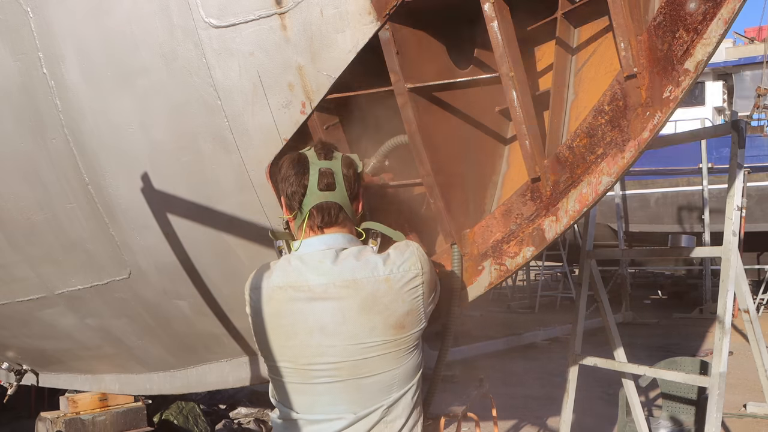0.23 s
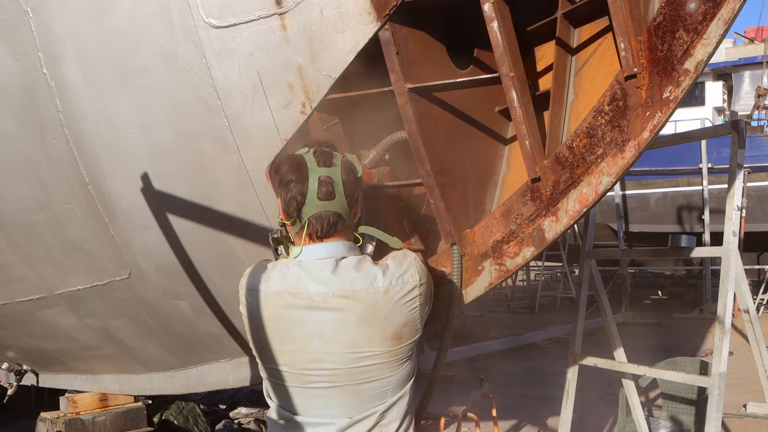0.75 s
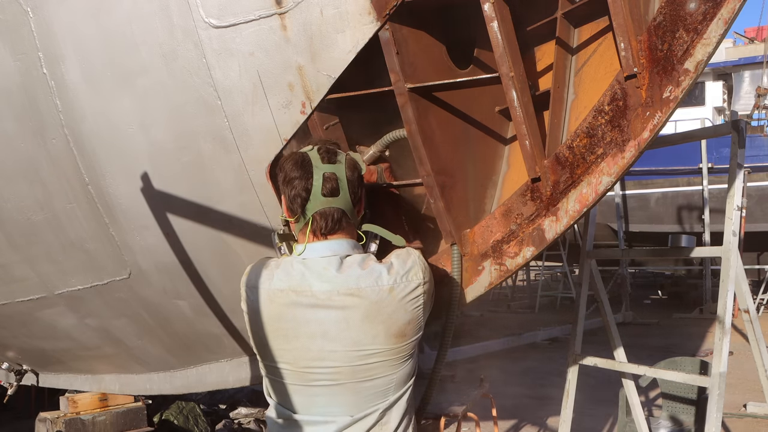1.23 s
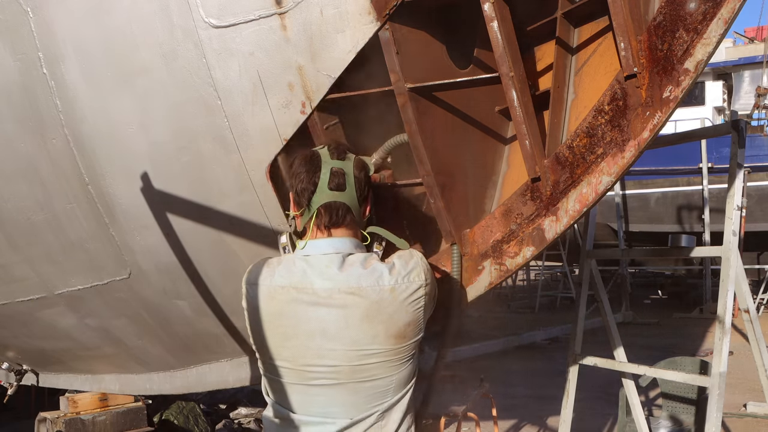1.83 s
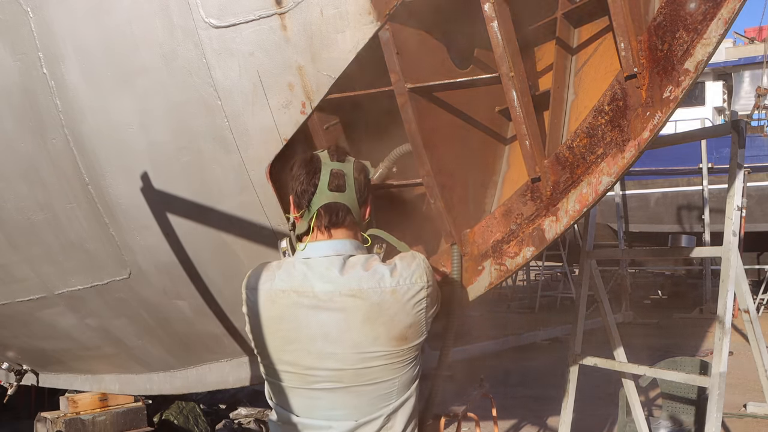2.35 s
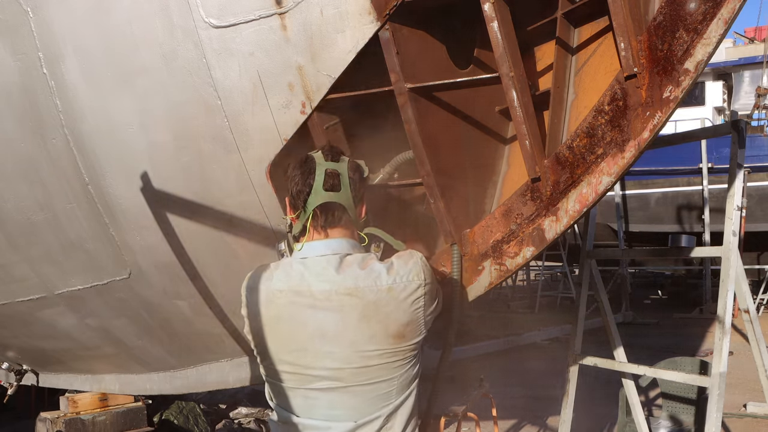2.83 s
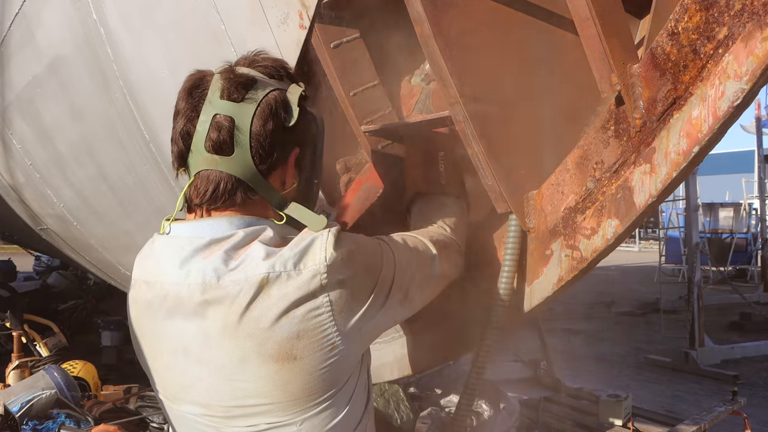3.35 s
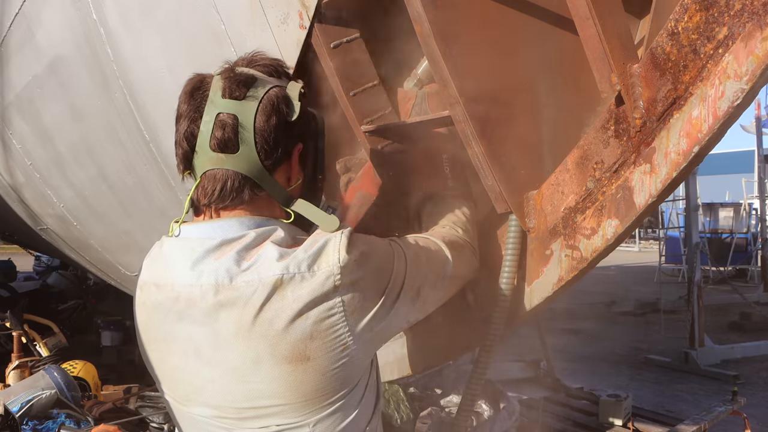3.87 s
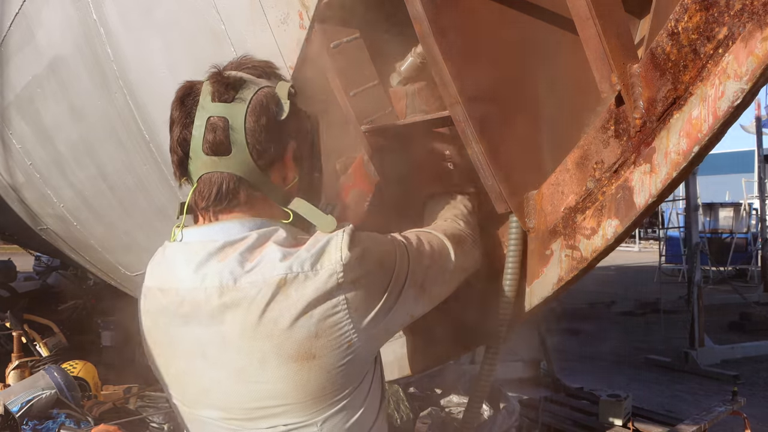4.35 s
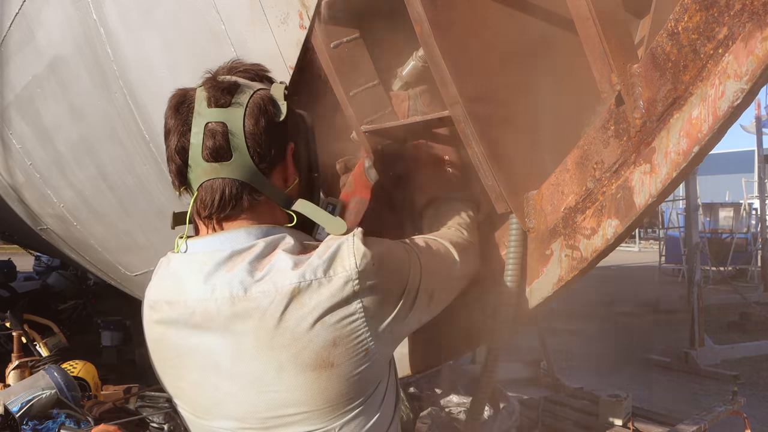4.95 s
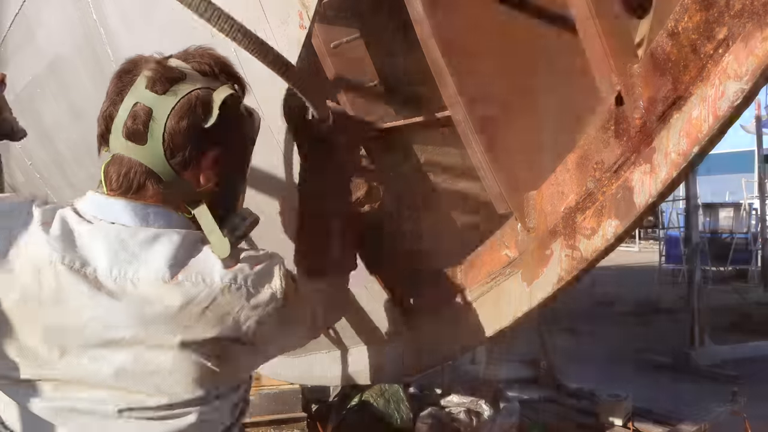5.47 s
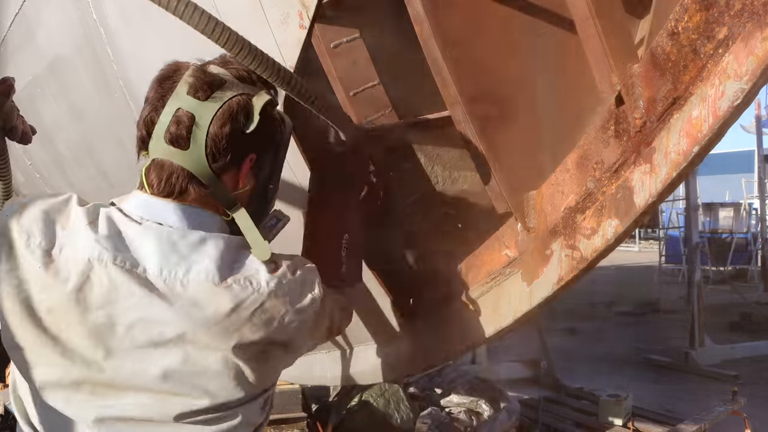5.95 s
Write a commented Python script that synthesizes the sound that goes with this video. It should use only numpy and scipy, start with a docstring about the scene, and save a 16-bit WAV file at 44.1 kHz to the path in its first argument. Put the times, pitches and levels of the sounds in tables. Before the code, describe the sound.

An unbroken pressurised hiss packed with tiny grain impacts scours a metal hull, heard close in mono. The feed sputters slightly, flaring as it bites and dipping as it slips, with brief airy whistling edges. The tone steps from hollow and boomy to bright and ringing, then to a thin sizzle with little body. A few soft low thumps from the hose and a very faint yard rumble lie underneath.

```python
"""A sandblaster plays a steady jet of air and grit on rusty plate inside a steel boat hull, over faint yard rumble.
First it fills a deep bay: noise and grain impacts ring through the bay's resonances, with early air puffs on the mic.
The grit feed sputters, the jet flares, sings at edges or slips, and the hose now and then bumps as a low push.
Near 3 s the jet moves to a corner by a rib, near 5.5 s to the open edge, and from 6 s it only grazes that edge.
Treble peaks and dips come and go, some steady, some gliding, and short delayed reflections comb the treble."""
import sys
import numpy as np
from scipy import signal
from scipy.fft import rfft, irfft, next_fast_len
from scipy.io import wavfile
from scipy.ndimage import map_coordinates

SR = 44100
rng = np.random.default_rng(int(sys.argv[2]) if len(sys.argv) > 2 else 0)


def store_wav(level_fs):
    """Save 16-bit WAV to argv[1]."""
    pcm = np.round(np.clip(np.atleast_2d(level_fs), -1, 1) * 32767)
    wavfile.write(sys.argv[1], SR, pcm.T.astype(np.int16))


N = 273661


def amp(db):
    """Decibels to gain."""
    return 10 ** (np.asarray(db) / 20)


def unit(x):
    """Scale to rms 1."""
    return x / np.sqrt(np.mean(x ** 2) + 1e-20)


def clock():
    """The time of every sample in seconds."""
    return np.arange(N) / SR


def along(points, hz):
    """Read (f/Hz, value) points on a log frequency axis."""
    f, value = np.transpose(points)
    return np.interp(np.log(hz + 1), np.log(f + 1), value)


def curves(rows):
    """One value per sample for each column after the time."""
    s, *columns = np.transpose(rows)
    return [np.interp(clock(), s, column) for column in columns]


def wobble(rate):
    """A smooth random curve of rms 1, with rate knots a second."""
    knots = rng.standard_normal(4096)
    return unit(map_coordinates(knots, [clock() * rate], mode="wrap"))


def swell(s, length, release):
    """From 0 to 1 and back: a fast rise, a hold until s + length, then a release."""
    attack_s = 0.0094
    since = clock() - s
    rise = since / attack_s
    fall = 1 - (since - length) / release
    return np.clip(np.minimum(rise, fall), 0, 1)


def filtered(x, gain):
    """x times a gain that depends on frequency."""
    size = next_fast_len(N + SR // 4)
    hz = np.fft.rfftfreq(size, 1 / SR)
    return irfft(rfft(x, size) * gain(hz), size)[:N]


def ring(x, level_db, size=8192):
    """x through a causal, minimum-phase body with the given dB response: it rings after each grain."""
    hz = np.fft.rfftfreq(size, 1 / SR)
    cepstrum = irfft(np.log(amp(level_db(hz))))
    # fold the cepstrum onto positive time, so that nothing sounds before the blow
    cepstrum[1:size // 2] *= 2
    cepstrum[size // 2 + 1:] = 0
    response = irfft(np.exp(rfft(cepstrum)))
    return signal.fftconvolve(x, response)[:N]


def delayed(x, delay_s):
    """x heard over a path whose delay changes from moment to moment."""
    fine = signal.resample_poly(x, up=4, down=1)  # a finer grid for smooth interpolation
    position = (clock() - delay_s) * SR * len(fine) / N
    return np.interp(position, np.arange(len(fine)), fine)


def rumble(colour):
    """Noise of rms 1 with the given spectrum."""
    return unit(filtered(rng.standard_normal(N), lambda hz: amp(along(colour, hz))))


# distant rumble: f/Hz, relative level/dB
YARD_SPECTRUM = [(25, -8), (60, -7.5), (95, -0.5), (140, -21), (230, -8), (500, -18), (3000, -50)]


def yard(level_db):
    """The faint rumble of the boatyard: low noise of slightly uneven level."""
    return amp(level_db + 2.0 * wobble(12)) * rumble(YARD_SPECTRUM)


# stray air on the microphone: t/s of the peak, half length/s, level/dB
AIR_PUFFS = [(0.253, .028, -53.5), (.338, .025, -59), (1.755, 0.03, -54.5), (1.815, .03, -55),
             (1.91, .03, -66)]
# f/Hz, relative level/dB
PUFF_SPECTRUM = [(20, -14), (60, -4), (130, 1), (200, -1), (300, -14), (900, -50), (3000, -120)]


def puffs():
    """Soft low bumps of air on the microphone: bell-shaped bursts of low noise."""
    t = clock()
    push = sum(amp(db) * np.exp(-((t - s) / half) ** 2) for s, half, db in AIR_PUFFS)
    return push * rumble(PUFF_SPECTRUM)


# the hose bumps dully on the hull: t/s, strength/dB
HOSE_KNOCKS = [(.753, -14), (2.598, -13), (3.362, -7), (5.355, -7)]
# response of the hull to a bump: f/Hz, level/dB
KNOCK_RESPONSE = [(15, -14), (50, -3), (120, 0), (220, -4), (350, 3), (480, 6), (900, -33), (3000, -70)]


def knocks():
    """Each bump of the soft hose is one low push that hardly rings."""
    blows = np.zeros(N)
    for s, db in HOSE_KNOCKS:
        blows[round(s * SR)] = amp(db)
    return ring(blows, lambda hz: along(KNOCK_RESPONSE, hz))


# the jet catches an edge and briefly sings there: t/s, length before release/s, f/Hz, width/Hz, level/dB
EDGE_TONES = [(2.21, .07, 7500, 300, -43), (2.95, .075, 2500, 450, -37), (2.967, 0.084, 5400, 1600, -37),
              (4.192, .2, 7350, 450, -41), (4.22, .15, 12850, 400, -43), (4.63, .1, 7250, 250, -40.5),
              (4.64, 0.1, 8200, 400, -40), (4.75, 0.65, 945, 50, -53.5), (5.04, 0.11, 7180, 250, -40),
              (5.466, 0.048, 1130, 220, -41.5), (5.47, 0.061, 2300, 1100, -38),
              (5.796, 0.12, 3900, 1700, -41), (5.97, .23, 7100, 250, -42)]


def catches():
    """Airy edge tones, bands of noise that start abruptly and fade as the jet sweeps past."""
    release_s = 0.025
    out = np.zeros(N)
    for s, length, pitch, width, db in EDGE_TONES:
        air = rng.standard_normal(N)
        tone = unit(filtered(air, lambda hz: 1 / (1 + (1.6 * (hz - pitch) / width) ** 4)))
        out += amp(db) * swell(s, length, release_s) * tone
    return out


def stream(grains_per_s, size_spread_db, grit_db, sputter_db, surge_db):
    """Rushing air plus countless grain impacts of uneven size; the feed comes in clumps."""
    air = rng.standard_normal(N)
    lands = rng.random(N) < grains_per_s / SR
    polarity = rng.choice([-1, 1], N)
    size_db = size_spread_db * np.clip(rng.standard_normal(N), -3, 3)
    grit = unit(lands * polarity * amp(size_db))
    feed = amp(sputter_db * wobble(110) + surge_db * wobble(23.54))
    return unit((air + amp(grit_db) * grit) * feed)


def rib_echoes(x, strength, sway_s, sway_rate, count=8):
    """Short treble echoes off the narrow ribs; their paths shift as the hand sways, so the hiss shimmers."""
    treble = filtered(x, lambda hz: 1 - 1 / (1 + (hz / 1800) ** 4))  # narrow ribs mirror only treble
    paths_s = rng.uniform(.002, .012, count)
    echoes = sum(delayed(treble, path_s + sway_s * wobble(sway_rate)) for path_s in paths_s)
    return unit(x + strength * echoes)


def spot(x, colour, modes):
    """The stream ringing in one bay, as four registers of rms 1: boom, roar, rasp and hiss."""
    def response_db(hz):
        """Broad colour plus the resonances of the air and the steel."""
        lift_db = sum(db / (1 + (2 * (hz - f) / width) ** 2) for f, width, db in modes)
        return along(colour, hz) + lift_db

    body = ring(x, response_db)
    bass, low, middle = (filtered(body, lambda hz: 1 / (1 + (hz / edge) ** 10)) for edge in (400, 1800, 5000))
    return np.array([unit(bass), unit(low - bass), unit(middle - low), unit(body - middle)])


def arrival(s, length):
    """Share of the jet on the next spot: 0 before the move, 1 after it, half at s."""
    return np.clip((clock() - s) / length + .5, 0, 1)


# the jet slips off the metal and roar, rasp and hiss dip briefly together: t/s of the dip, half length/s, loss/dB
JET_SLIPS = [(2.41, .025, 1.2), (3.493, 0.077, 1.5), (4.81, .02, 1), (5.665, 0.026, 1.5)]


def slips():
    """Decibels that roar, rasp and hiss all lose while the jet is off the metal."""
    t = clock()
    return sum(db * np.exp(-((t - s) / half) ** 2) for s, half, db in JET_SLIPS)


# the jet bites into a rib or a fresh patch and flares up:
# t/s, length before release/s, release/s, rasp gain/dB, hiss gain/dB
JET_FLARES = [(1.928, .03, .05, 1.4, .8), (2.685, 0.06, .05, 2, 0.7), (2.943, 0.11, .01, 1.9, 1),
              (2.95, .1, .06, 0, 1.2), (3.027, .016, .008, 1, 1), (3.332, .02, .015, 2, 1),
              (3.59, 0.2, .06, -0.2, 0.8), (4.17, 0.14, .08, 0.8, 1), (4.65, .07, .04, -0.3, .9),
              (5.04, 0.433, .02, 0.6, 2.5), (5.165, 0.023, .02, 2, -0.5), (5.465, 0.05, .09, 0.5, 5),
              (5.782, 0.43, .02, 1, 2.5)]


def flares():
    """Change of rasp and hiss in dB while the jet bites."""
    return sum(np.outer([rasp_db, hiss_db], swell(s, length, release))
               for s, length, release, rasp_db, hiss_db in JET_FLARES)


# slow drift of the jet as the hand guides it: t/s, strength on the plate/dB, nozzle hiss over that strength/dB
JET_DRIFT = [(0, -29.6, 1.5), (.2, -30, 1.5), (.45, -31, 1.5), (.7, -31.9, 1.8), (1.05, -31.5, 1.5),
             (1.5, -32.5, 1), (1.7, -31, 0.8), (2.3, -31.5, -0.4), (2.6, -31.5, .3), (2.9, -31, -0.5),
             (3.1, -31.5, 1.8), (3.35, -31.5, 1.6), (3.95, -32, 1.5), (4.3, -32, 2), (4.55, -32.5, 2.7),
             (4.85, -33, 3.5), (5.02, -33, 2.5), (5.2, -34, 4), (5.42, -33.5, 2.5), (5.6, -32, 1.5),
             (5.9, -32.5, 2), (6.2, -33.5, 3)]
# the hollow roar of the bay follows the strength on the plate: t/s, roar relative to it/dB
HOLLOW_ROAR = [(.2, -10.2), (.8, -12), (1.2, -13), (1.55, -10.8), (2.2, -11.5), (2.5, -9.5), (3.2, -11),
               (3.5, -10.5), (4.1, -10.5), (4.8, -11), (5.2, -11), (5.45, -12), (5.75, -11), (6.03, -13.5),
               (6.1, -16), (6.2, -12)]
# low boom before the opening thins it, with a brief swell of air on the microphone at 1.8 s: t/s, level/dB
LOW_BOOM = [(0, -52.5), (.3, -56), (.6, -57.5), (1.1, -58), (1.68, -57.5), (1.8, -52.5), (1.9, -55.5),
            (2.7, -52.5), (3.2, -58), (4.3, -59), (4.9, -61.5), (5.45, -62), (5.52, -67), (5.9, -64),
            (6.2, -66)]


def register_levels():
    """Boom in dB on its own curve; roar, rasp and hiss in dB follow the jet's strength on the plate."""
    drift_db, bright_db = curves(JET_DRIFT)
    hollow_db, = curves(HOLLOW_ROAR)
    boom_db, = curves(LOW_BOOM)
    strength_db = drift_db - slips()
    rasp_flare_db, hiss_flare_db = flares()
    rust_db = 0.29 * wobble(30)  # rust comes off unevenly
    sizzle_db = 0.24 * wobble(18)  # the spray of rebounding grit comes in surges
    # a grazing jet hardly excites the hull
    grazing = arrival(*SPOT_MOVES[-1])
    roar_loss_db, rasp_loss_db = 5, 1
    roar_db = strength_db + hollow_db - roar_loss_db * grazing
    rasp_db = strength_db + rasp_flare_db + rust_db - rasp_loss_db * grazing
    hiss_db = strength_db + bright_db + hiss_flare_db + sizzle_db
    return [boom_db, roar_db, rasp_db, hiss_db]


# the jet moves to the next spot: t/s of the midpoint, length of the move/s
SPOT_MOVES = [(2.95, 0.036), (5.475, 0.011), (6.04, 0.012)]
# broad colour of each spot, and of the edge when grazed: f/Hz, relative level/dB
DEEP_SPECTRUM = [(30, -29.0), (110, -24), (160, -26), (195, -13), (400, -20.3), (1000, -11.8),
                 (1900, -15.7), (2600, -3.7), (3400, 0.0), (5000, -4.9), (8000, -4.7), (11000, -8.8),
                 (15500, -12.3)]
RIB_SPECTRUM = [(30, -29.0), (150, -23.6), (200, -19.6), (400, -19.8), (1000, -15.5), (1900, -7.2),
                (2600, 0.0), (3400, -1.6), (5000, -2.5), (8000, -1.0), (11000, -4.2), (15500, -7.5)]
EDGE_SPECTRUM = [(30, -33.4), (150, -27.9), (200, -25.5), (400, -27.3), (1000, -22.6), (1900, -9.5),
                 (2600, -4.7), (3400, 0.0), (5000, -3.1), (8000, -2.5), (11000, -6.5), (15500, -9.5)]
GRAZE_SPECTRUM = [(30, -34), (200, -27), (400, -29), (1000, -35), (1900, -19), (2600, -10), (3400, -7),
                  (5000, -5.5), (8000, -2.5), (11000, -4), (15500, -13)]
# resonances of the air and the steel at each spot: f/Hz, width/Hz, lift/dB
DEEP_RESONANCES = [(295, 40, 5.5), (446, 112, 8.8), (839, 83, 10.5), (1006, 46, 4.2), (1163, 62, 5.0),
                   (1530, 100, 6.3), (1620, 110, 6.5), (1926, 182, 6.8), (2122, 60, 4.4), (2277, 71, 4.9),
                   (2421, 37, 3.1), (3024, 439, 3.6), (4900, 400, 1.5), (5306, 120, 2.2), (5782, 444, 1.8),
                   (6803, 79, 2.8), (12965, 1085, 2.8)]
RIB_RESONANCES = [(235, 50, 3), (335, 80, 6.5), (482, 60, 11.5), (597, 52, 11.3), (632, 40, 10.3),
                  (738, 42, 12.8), (786, 36, 9), (856, 50, 10), (948, 70, 9.5), (1005, 30, 5),
                  (1090, 50, 7), (1185, 70, 6), (1255, 30, 4), (1361, 100, 6.3), (1549, 33, 4.1),
                  (1690, 120, 4.3), (2200, 42, 3.3), (3430, 400, 6.8), (3889, 44, 3.7), (4065, 76, 4.4),
                  (4477, 193, 3.5), (5150, 200, 1.6), (5520, 250, -1), (6480, 400, 2), (7251, 400, 1.2),
                  (8250, 400, 1), (11620, 300, 1.8), (12904, 800, 2.4)]
EDGE_RESONANCES = [(479, 61, 4.0), (602, 67, 4.0), (812, 164, 7.0), (949, 30, 3.4), (1067, 197, 11.0),
                   (1250, 79, 8.9), (1368, 32, 4.2), (1517, 104, 5.7), (1692, 39, 4.5), (1907, 35, 3.8),
                   (2194, 41, 6.2), (3758, 76, 3.0), (4049, 51, 5.0), (5150, 200, 1.8), (5630, 250, 2.3),
                   (6500, 300, 2), (7170, 170, 4.5), (7900, 400, 1.5), (8698, 374, 1.9), (9650, 300, 1.7),
                   (11150, 600, -1.2), (12700, 1200, 2.8), (13970, 200, 2.2)]


def blast():
    """The jet passes from spot to spot, each with its own colour and resonances."""
    jet = stream(grains_per_s=9000, size_spread_db=3.5, grit_db=-2.5, sputter_db=0.43, surge_db=0.27)
    jet = rib_echoes(jet, strength=0.13, sway_s=.00007, sway_rate=3)
    registers = spot(jet, DEEP_SPECTRUM, DEEP_RESONANCES)
    later = [(RIB_SPECTRUM, RIB_RESONANCES), (EDGE_SPECTRUM, EDGE_RESONANCES),
             (GRAZE_SPECTRUM, EDGE_RESONANCES)]
    for (s, length), (colour, modes) in zip(SPOT_MOVES, later):
        share = arrival(s, length)
        registers = (1 - share) * registers + share * spot(jet, colour, modes)
    sound = np.sum(registers * amp(register_levels()), axis=0)
    return filtered(sound, lambda hz: hz / np.hypot(hz, 70))  # the opening radiates little bass


# short treble reflections, two nearly steady near the microphone, three drifting off nearby steel;
# one curve each: t/s, delay/ms, strength (negative = inverted)
REFLECTIONS = [
    [(2.2, .312, 0), (2.5, .313, .1), (3.0, .319, .06), (3.4, .294, .13), (3.72, .281, .2), (4.0, .28, 0)],
    [(1.0, .533, .03), (2.3, .539, .08), (4.1, .529, .02), (4.35, .528, .07), (5.3, .543, .05),
     (6.2, .531, .04)],
    [(2.0, .7, .03), (3.1, .697, .06), (4.0, .702, .06), (4.22, .694, .15), (4.5, .697, .07),
     (5.3, .712, .03), (6.2, .699, .1)],
    [(2.9, .935, 0), (3.25, .968, -.08), (3.5, .98, -.08), (3.72, .996, -.18), (4.0, .97, -.09),
     (4.27, .985, -.11), (4.5, .975, -.09), (4.8, 1.017, -.11), (5.2, .98, 0)],
    [(3.3, 1.221, 0), (4.0, 1.224, .11), (4.33, 1.25, .14), (4.7, 1.241, .12), (5.05, 1.259, .07),
     (5.52, 1.26, .12), (5.75, 1.248, .08), (6.0, 1.254, .15), (6.2, 1.29, .06)],
]


def short_reflections(x):
    """The blast plus delayed copies of its treble, which add and cancel as a comb; some delays drift."""
    treble = filtered(x, lambda hz: 1 - 1 / (1 + (hz / 3500) ** 6))
    echoes = sum(strength * delayed(treble, delay_ms / 1000) for delay_ms, strength in map(curves, REFLECTIONS))
    return x + echoes


# passing treble peaks (lift) and dips (negative lift), some steady, some gliding:
# start t/s, end t/s, first f/Hz, last f/Hz, width/Hz, lift/dB
PASSING_PEAKS = [(.7, 1.22, 4860, 4820, 200, 4.5), (1.15, 1.55, 6150, 6150, 300, 1),
                 (1.5, 2.9, 4180, 4600, 350, -1.5), (3.8, 4.8, 5500, 5750, 500, -0.5),
                 (4.05, 4.75, 4500, 4470, 130, 1), (4.4, 4.75, 13850, 13750, 400, -1),
                 (4.42, 4.87, 11900, 11480, 380, 3), (4.747, 5.07, 5480, 5560, 420, 4),
                 (4.72, 5.1, 4000, 3950, 600, -4), (4.98, 5.3, 7600, 7600, 220, -2),
                 (5.55, 5.85, 4400, 4500, 500, -3), (3.05, 3.6, 10000, 9750, 350, 1),
                 (3.55, 3.95, 7350, 7480, 300, 1), (5.75, 6.1, 8600, 8800, 300, 1.5),
                 (5.98, 6.3, 2400, 2400, 900, -2.5)]


def passing_peaks(x, size=512):
    """Treble peaks and dips that come and go, some steady, some gliding, as gains on short-time spectra."""
    fade_s = 0.083  # each comes and goes gradually
    hz, t, z = signal.stft(x, SR, nperseg=size)
    lift_db = np.zeros(z.shape)
    for start, end, first_hz, last_hz, width, db in PASSING_PEAKS:
        centre = np.interp(t, [start, end], [first_hz, last_hz])
        presence = np.clip(np.minimum(t - start, end - t) / fade_s, 0, 1)
        lift_db += db * presence / (1 + (2 * (hz[:, None] - centre) / width) ** 2)
    return signal.istft(z * amp(lift_db), SR, nperseg=size)[1][:N]


def scene():
    """One microphone feeds both channels."""
    background = yard(level_db=-76.0) + puffs() + knocks()
    jet = catches() + passing_peaks(short_reflections(blast()))
    sound = background + jet
    return np.array([sound, sound])


def record(dry):
    """Nothing above the band limit is kept."""
    top_hz = 15750
    return np.array([filtered(channel, lambda hz: hz < top_hz) for channel in dry])


dry = scene()
out = record(dry)
store_wav(out)
```